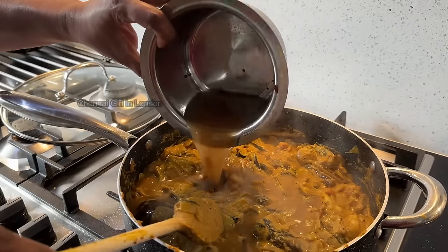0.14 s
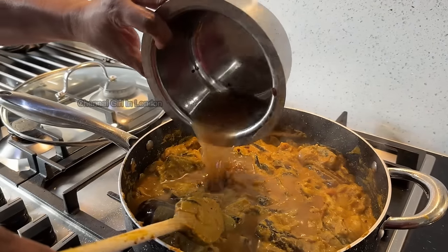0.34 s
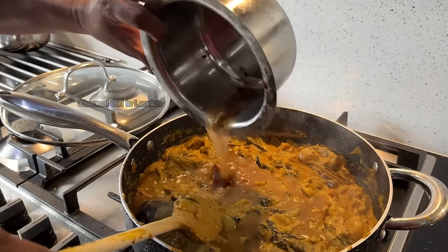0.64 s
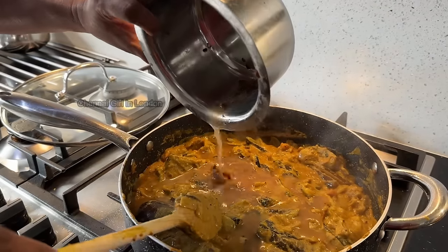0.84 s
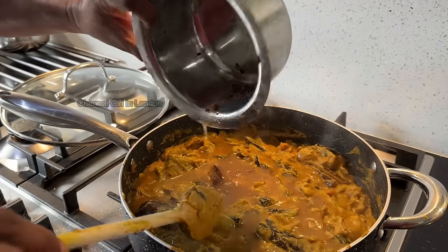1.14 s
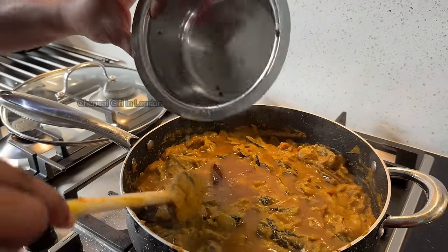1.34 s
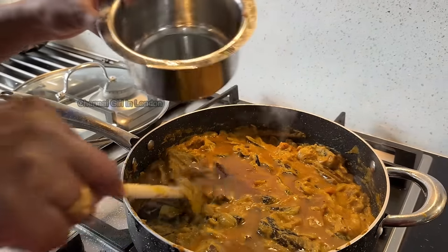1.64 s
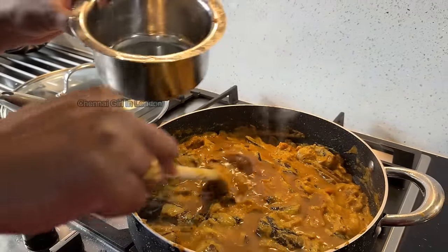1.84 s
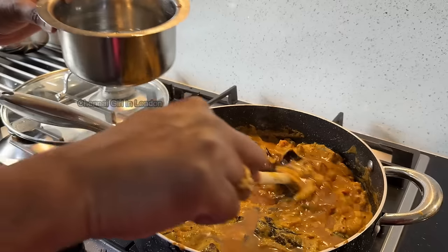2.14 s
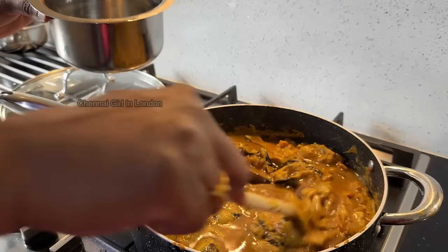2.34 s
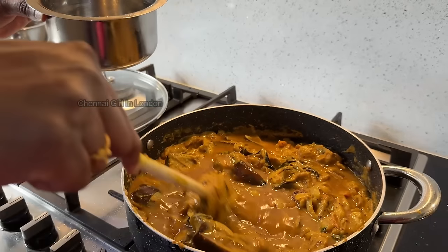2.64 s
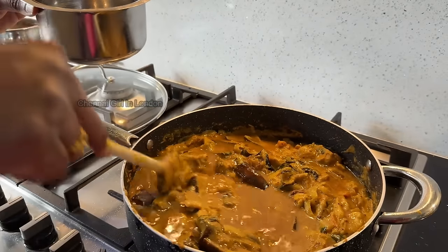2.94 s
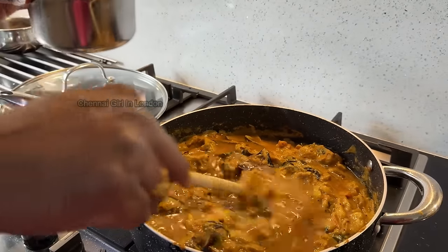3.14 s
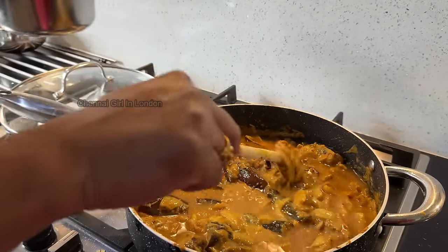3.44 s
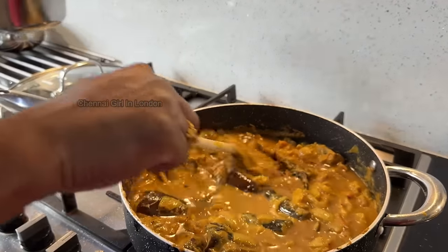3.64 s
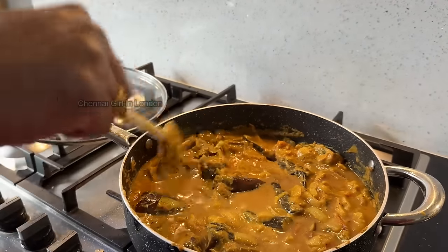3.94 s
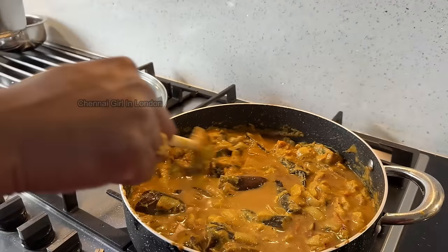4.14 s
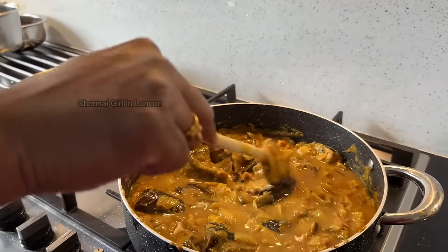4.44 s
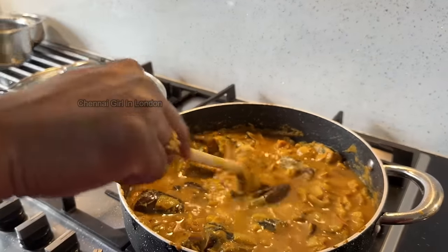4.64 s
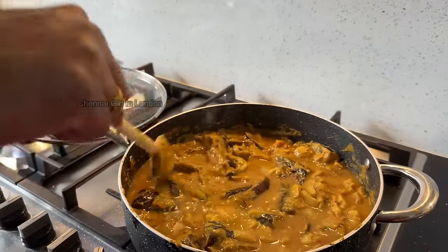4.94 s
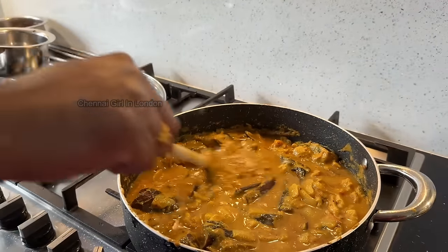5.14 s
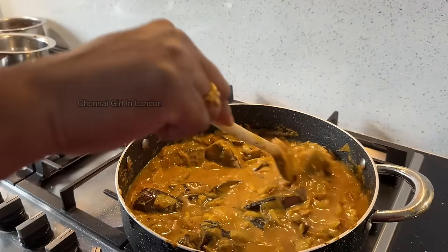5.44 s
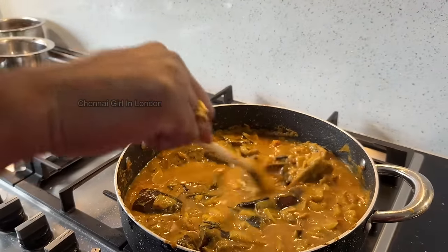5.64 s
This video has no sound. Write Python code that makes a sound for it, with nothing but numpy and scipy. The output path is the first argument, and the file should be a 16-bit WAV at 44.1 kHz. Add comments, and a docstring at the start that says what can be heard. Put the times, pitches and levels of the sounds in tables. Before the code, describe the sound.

A thin stream of liquid plinks and gurgles into a simmering pan, a spoon stirs softly, then a steel pot clangs down.

```python
"""Pouring and stirring a simmering curry

A thin stream of liquid falls from a pot into a pan of curry, then a wooden spoon stirs it.
Trapped bubbles plink as damped, rising tones; spits, steam and sauce are short bursts of filtered noise.
A gas burner hisses as shaped noise over a hum of sine lines at fixed frequencies, most wavering strongly.
Near the end the emptied steel pot is set down: its knocks excite decaying modes and a dense clang."""
import sys
import numpy as np
from scipy import signal
from scipy.fft import rfft, irfft
from scipy.io import wavfile

SR = 44100
rng = np.random.default_rng(int(sys.argv[2]) if len(sys.argv) > 2 else 0)


def wav_record(signal):
    """Record a signal, one row per channel, as 16-bit PCM in the file named by sys.argv[1]."""
    frames = np.transpose(np.atleast_2d(signal))
    bounded = np.clip(frames, -1, 1)
    # unit amplitude maps onto the largest positive 16-bit level
    quanta = np.round(bounded * 32767).astype(np.int16)
    wavfile.write(sys.argv[1], SR, quanta)


N = 255780
TIME = np.arange(N) / SR

# the falling stream, which thins, gives a last gush and dribbles out: (time [s], relative flow [dB])
POUR_FLOW = [(0, -3), (.1, -4), (.4, -2), (.5, 2), (.68, -10.5), (.8, -2.5), (1.02, -13), (1.3, -14),
             (1.5, -50)]


def gain_of(db):
    """Amplitude ratio: 20 dB for each factor of ten."""
    return 10 ** (np.asarray(db) / 20)


def evened(x):
    """Normalization to unit rms."""
    return x / np.sqrt(np.mean(x ** 2) + 1e-20)


def read(points, hz):
    """Linear interpolation of (frequency [Hz], value) on a log-frequency axis."""
    f, value = np.transpose(points)
    return np.interp(np.log(hz + 1), np.log(f + 1), value)


def level(points):
    """Envelope: (time [s], level [dB]) becomes a gain for every sample."""
    return gain_of(np.interp(TIME, *np.transpose(points)))


def add(mix, s, sound):
    """Superposition: sums a sound into the mix from time s, cut at the end."""
    part = mix[max(round(s * SR), 0):][:len(sound)]
    part += sound[:len(part)]


def hump(f, hz, width):
    """Resonance curve: gain 1 at the centre, falling with the square of the far detuning."""
    return 1 / (1 + (1.3 * (f - hz) / width) ** 2)


def colour(x, gain):
    """Linear filtering: the spectrum times a gain that is a function of frequency; rms 1."""
    f = np.fft.rfftfreq(len(x), 1 / SR)
    return evened(irfft(rfft(x) * gain(f), len(x)))


def band_noise(hz, width, size):
    """Subtractive synthesis: white noise through one resonance; rms 1."""
    return colour(rng.standard_normal(size), lambda f: hump(f, hz, width))


def drift(rate):
    """Low-passed random fluctuation without a mean; rms 1."""
    return colour(rng.standard_normal(N), lambda f: (f > 0) / (1 + (f / rate) ** 4))


def dying(x, t60s):
    """Frequency-dependent damping: each band loses 60 dB in its own t60."""
    hz, t, z = signal.stft(x, SR, nperseg=256)
    decay = gain_of(-60 * t / read(t60s, hz)[:, None])
    return signal.istft(z * decay, SR, nperseg=256)[1][:len(x)]


def plink(hz, t60, glide=.05, rise=0.00044):
    """Damped oscillator: a tone whose pitch climbs by twice the glide share over its t60."""
    t = np.arange(0, t60, 1 / SR)
    tone = np.sin(2 * np.pi * hz * t * (1 + glide * t / t60))
    return tone * gain_of(-60 * t / t60) * (1 - np.exp(-t / rise))


def burst(hz, width, t60):
    """Impulsive band noise: a crack of about a millisecond over a short exponential decay."""
    t = TIME[:4096]
    attack = 1 - np.exp(-t / .0001)
    shape = (.7 * gain_of(-60 * t / t60) + np.exp(-t / .0008)) * attack
    return evened(band_noise(hz, width, size=len(t)) * shape) * np.sqrt(np.mean(shape ** 2))


def clicks(per_s, spread_db):
    """Random impulse train: uniform times, and exponentially spread decibels that make a few large."""
    at, size = rng.random((16000, 2))[:round(per_s * N / SR)].T
    heights = gain_of(spread_db * np.minimum(-np.log(1 - size), 3))
    return np.bincount((at * N).astype(int), heights, N)


def grains(sound, per_s, spread_db):
    """Granular synthesis: one short sound repeated at random times and sizes."""
    out, train = np.zeros(N), clicks(per_s, spread_db)
    for at in np.flatnonzero(train):
        add(out, at / SR, train[at] * sound)
    return out


def hum():
    """Additive synthesis: sine lines at fixed frequencies, the 100 Hz one nearly steady, most others
    wavering strongly in amplitude and phase."""
    # mains hum and motor lines: (frequency [Hz], rms level [dB], waver [share of the level])
    lines = [(100.1, -40, 0.044), (299, -43, 0.17), (329.9, -51, 0.45), (232, -56.5, 0.68),
             (406.3, -56.5, 0.58), (761, -57, 0.85), (693, -62, 0.79), (971, -58.5, .7), (1890, -57, 0.97)]
    out = np.zeros(N)
    for hz, db, waver in lines:
        wander = 1 + waver * (drift(4.0) + 1j * drift(5.7)) / np.sqrt(2)
        line = (wander * np.exp(2j * np.pi * hz * TIME)).real
        out += gain_of(db) * np.sqrt(2 / (1 + waver ** 2)) * line
    return out


def burner(db=-40.0):
    """Turbulence noise of flame and air, with the gas jet's hiss at the resonances of its tube."""
    # steady rush of air and flame: (frequency [Hz], relative spectral level [dB per Hz])
    rush = [(25, -34), (42, -18), (68, 4), (130, 1), (200, -1), (380, -3), (530, -7.5), (1100, -5),
            (1450, -11.5), (3200, -22.5), (6000, -19.5), (10000, -28), (13000, -29.5), (15700, -26)]
    # resonances of jet and tube: (frequency [Hz], width [Hz], peak on the scale of the rush [dB])
    resonances = [(1717, 110, -4), (1848, 182, -3.5), (4580, 420, -12.5), (7234, 260, -6), (8540, 640, -13),
                  (9450, 300, -19), (10470, 140, -19), (11740, 300, -15), (12300, 700, -17)]

    def gain(f):
        power = gain_of(read(rush, f)) ** 2
        for hz, width, peak_db in resonances:
            power = power + (gain_of(peak_db) * hump(f, hz, width)) ** 2
        return np.sqrt(power)
    return gain_of(db) * colour(rng.standard_normal(N), gain)


def kitchen(x, near_db=-9, tail_db=-12):
    """Convolution reverberation: quick reflections from pan wall and tiles, then the short room tail."""
    # decay time of the room: (frequency [Hz], t60 [s])
    room_t60 = [(100, 0.43), (1000, 0.43), (5000, 0.25), (15000, 0.29)]
    t = TIME[:SR // 2]
    signs = rng.choice([-1., 1.], len(t))
    taps = signs * (rng.random(len(t)) < 2500 / SR) * (t > .001)
    near = taps * gain_of(-60 * t / 0.04)
    tail = dying(taps * (t > .008), room_t60)
    echo = gain_of(near_db) * near / np.linalg.norm(near) + gain_of(tail_db) * tail / np.linalg.norm(tail)
    return x + signal.fftconvolve(x, echo)[:N]


def seethe(db=-48, cool_db_per_s=1.5, low_hz=1500, high_hz=6200):
    """Stochastic superposition: a crowd of small wet bursts in the thinned sauce, calming as it cools."""
    pitches = np.linspace(low_hz, high_hz, num=12)
    crowd = sum(grains(burst(hz, width=970, t60=0.027), per_s=50, spread_db=3) for hz in pitches)
    return gain_of(db - cool_db_per_s * TIME) * evened(crowd)


def pushing():
    """Exponential envelopes: each push of the spoon swells to its peak and fades alike."""
    # pushes through thick sauce: (time of the hardest push [s], swell and fade time [s], level [dB])
    strokes = [(1.22, 0.055, -42), (2.03, 0.16, -40.5), (2.43, .1, -48), (2.75, .06, -45.5),
               (3.12, 0.044, -37.5), (3.88, 0.11, -49), (5.189, .034, -34.5)]
    return sum(gain_of(db) * np.exp(-abs(TIME - s) / fade) for s, fade, db in strokes)


def simmer(db=-48.5, cool_db_per_s=1.7, pour_flare_db=4, stir_flare_db=36):
    """Boiling noise: tiny steam blisters tick, many very high; new liquid cools, pour and spoon stir."""
    pitches = np.concatenate([np.linspace(11600, 14800, num=16), np.linspace(3000, 11000, num=9)])
    ticks = sum(grains(burst(hz, width=2200, t60=0.019), per_s=7, spread_db=5.0) for hz in pitches)
    pour_flare = gain_of(pour_flare_db) * level(POUR_FLOW)
    stir_flare = gain_of(stir_flare_db) * pushing()
    heat = gain_of(-cool_db_per_s * TIME) * np.sqrt(1 + pour_flare ** 2 + stir_flare ** 2)
    return gain_of(db) * heat * evened(ticks)


def sputter(first=3.7163, db=-32, body_db=-6, attack_s=.065, release_s=.08):
    """Relaxation oscillation: a steam vent puffs fifty times a second in a train that swells and fades."""
    out, ages = np.zeros(N), np.arange(1, 16) / 50
    for age in ages:
        opening = min(age / attack_s, 1, (ages[-1] - age) / release_s)
        hiss = burst(rng.normal(12800, 300), width=1900, t60=0.0092)
        body = gain_of(body_db) * burst(6300, width=2400, t60=0.009)
        add(out, first + age - ages[0], gain_of(db) * opening ** 2 * (hiss + body))
    return out


def pops(bubbles_db=3, spits_db=3, snap_db=-7):
    """Bubble resonance and bursting: single plinks, each with a small wet snap, and single spits."""
    # largest trapped air bubbles, the last row instead the narrow ping that rings with the spoon's tick at 3.6
    # s: (time [s], level before bubbles_db [dB], pitch [Hz])
    bubbles = [(0.0774, -22, 5100), (.1106, -30, 4750), (.1201, -25.5, 3160), (0.2202, -31, 4900),
               (0.2575, -28, 1760), (.2825, -28.5, 11600), (.298, -28, 3340), (0.3274, -18, 4430),
               (.3671, -29, 3470), (0.4076, -29, 9100), (0.432, -23, 2150), (.4612, -24.5, 2680),
               (.4855, -28, 5200), (.7565, -25, 2030), (.7903, -21, 4770), (0.8173, -26, 2590),
               (.8765, -27, 4100), (1.1912, -36, 5040), (1.4645, -31, 4500), (3.289, -31, 1210),
               (3.4183, -29, 4850), (3.446, -33, 6380), (3.6035, -26, 3760)]
    # loudest spits of drops and bursting blisters: (time [s], level before spits_db [dB], centre [Hz])
    spits = [(.1223, -39, 12500), (.161, -30.5, 1000), (.162, -33, 12700), (.3385, -33, 12000),
             (.369, -34, 4900), (.3993, -31, 5600), (.498, -32, 3600), (.508, -37, 11000),
             (.572, -29, 14000), (.573, -31, 3800), (.746, -32, 12400), (.757, -27.5, 6550),
             (.776, -33, 7650), (.778, -25, 14500), (0.836, -25, 11400), (.8401, -29, 1920),
             (1.548, -33, 12600), (2.245, -41, 12500), (2.488, -39, 13000), (4.87, -41, 13000),
             (5.2496, -39, 13200)]
    mid_hz = 3000  # pitch at which the times and the width below hold
    bubble_t60_s, bubble_damping = 0.018, 0.19  # ring time shortens with this power of the pitch
    spit_width_hz, spit_widening = 2500, .3  # band width grows with this power of the pitch
    spit_t60_s, spit_damping = .036, 0.53  # smaller, higher spits die sooner
    out = np.zeros(N)
    for s, db, hz in bubbles:
        snap = gain_of(snap_db) * burst(hz, width=1.0 * hz, t60=0.0063)
        ring = plink(hz, bubble_t60_s * (mid_hz / hz) ** bubble_damping, glide=0.033, rise=0.00053)
        add(out, s, gain_of(db + bubbles_db) * ring)
        add(out, s, gain_of(db) * snap)
    for s, db, hz in spits:
        width = spit_width_hz * (hz / mid_hz) ** spit_widening
        t60 = spit_t60_s * (mid_hz / hz) ** spit_damping
        add(out, s, gain_of(db + spits_db) * burst(hz, width, t60))
    return out


def rocking(count=4, start_s=5.653, gap_s=0.035, force_db=-19, loss_db=2.5, hz=203):
    """Impact energy loss: the pot rocks to rest in evenly spaced, ever weaker thuds, as rows of blows."""
    return [(start_s + k * gap_s, force_db - k * loss_db, hz) for k in range(count)]


def clatter(clang_db=-15.5, modes_db=-3.5, spot_db=-6, ring=0.99):
    """Modal synthesis: each knock sets off a dense clang and feeds energy into the pot's modes."""
    # the pot's base knocking down: (time [s], force [dB], pitch of the struck spot [Hz])
    blows = [(5.535, -7, 1308), (5.5385, -2, 2290), (5.5424, 0.5, 2258), (5.5557, -3.5, 2330),
             (5.5626, -6.5, 2260), (5.572, -11, 7780), (5.594, -8.5, 3355), (5.609, -11.5, 2250)]
    # strong modes of the steel pot: (frequency [Hz], level before modes_db [dB], t60 before ring [s])
    modes = [(302, -30, .3), (391, -22.5, .35), (480, -32, .8), (685, -30, .7), (735, -27, .6),
             (762, -20, .4), (813, -26, .3), (925, -28, .35), (957, -25, .4), (1058, -27, .35),
             (1445, -30, .45), (1600, -28, .3), (1780, -28, .4), (2160, -27, .55), (2268, -20, .4),
             (2319, -21, .36), (2562, -30, .25), (2895, -20, .33), (2965, -30, .35), (3361, -21, .38),
             (3550, -29, .3), (4716, -32, .43), (5055, -33, .5), (5271, -32, .42), (5353, -29, .35),
             (5548, -30, .25), (6535, -28, .45), (7719, -27, .22), (8440, -32, .28), (9938, -32, .22)]
    # crowd of weaker modes, blurred by the room: (frequency [Hz], relative level [dB per Hz], t60 [s])
    clang = np.array([(50, -26, 0.46), (130, -5, 0.46), (320, -5, .55), (750, 0, 0.59), (1300, 0, 0.43),
                      (2020, -1.5, 0.56), (2940, 3.5, 0.36), (3900, -4, 0.55), (5400, -3, 0.48),
                      (8350, -3.5, 0.33), (9200, -9, 0.34), (12200, -4.5, 0.27), (15700, -1.5, 0.16)])
    # spectral tilt of a knock at 0 dB force [dB per octave], and its change per dB of force
    bright_db_per_octave, bright_per_force_db = 1.86, 0.63
    out, feed = np.zeros(N), np.zeros(N)
    knots = np.arange(0, SR / 2, 55)
    # the weak modes differ in strength, alike for every knock
    uneven_db = 3 * rng.standard_normal(len(knots)) * np.minimum(knots / 4000, 1)
    for s, force_db, hz in list(blows) + rocking():
        # hard knocks are brighter
        bright_db = bright_db_per_octave + bright_per_force_db * force_db

        def spectrum(f):
            tilt_db = bright_db * np.log2(1 + f / 500)
            return gain_of(read(clang[:, :2], f) + np.interp(f, knots, uneven_db) + tilt_db)
        crash = colour(rng.standard_normal(SR // 2), spectrum)
        add(out, s, gain_of(clang_db + force_db) * dying(crash, clang[:, ::2]))
        add(out, s, gain_of(spot_db + force_db) * plink(hz, t60=0.048, glide=0, rise=0.002))
        add(feed, s, [gain_of(force_db) ** 2])
    for hz, db, t60 in modes:
        # energies of successive knocks add up while they decay
        kept = gain_of(-60 / (ring * t60 * SR)) ** 2
        energy = signal.lfilter([1], [1, -kept], feed)
        tone = np.sin(2 * np.pi * (hz * TIME + rng.random()))
        out += gain_of(db + modes_db) * np.sqrt(energy) * tone
    return out


def bumps(width_share=.55, t60_s=0.19):
    """Damped impact: dull knocks of the spoon nudging the pan, cushioned by the sauce."""
    # nudges: (time [s], level [dB], centre [Hz])
    nudges = [(1.966, -33.5, 230), (2.01, -30, 232), (2.375, -34.5, 200), (3.09, -38, 200),
              (5.175, -27.5, 620)]
    out, t = np.zeros(N), TIME[:SR // 4]
    shape = gain_of(-60 * t / t60_s) * (1 - np.exp(-t / 0.0045))
    for s, db, hz in nudges:
        knock = evened(band_noise(hz, width_share * hz, size=len(t)) * shape)
        add(out, s, gain_of(db) * knock * np.sqrt(np.mean(shape ** 2)))
    return out


def spoon_ticks(ticks_db=3):
    """Contact impact: wood meets the pan with a bright crack over a short, dry body."""
    # (time [s], body level before ticks_db [dB], body centre [Hz], crack level before ticks_db [dB])
    ticks = [(2.857, -34, 2900, -32.5), (3.4185, -39, 5500, -44), (3.603, -32, 3800, -50),
             (3.997, -35.5, 3900, -47), (4.17, -30.5, 2700, -34), (4.226, -32.5, 2900, -50),
             (4.5453, -37, 3000, -52), (4.6725, -40, 4200, -48), (5.1278, -30, 1800, -31.5)]
    out = np.zeros(N)
    for s, body_db, hz, edge_db in ticks:
        body = gain_of(body_db) * burst(hz, width=2360, t60=.035)
        crack = gain_of(edge_db) * burst(10000, width=22000, t60=0.028)
        add(out, s, body + crack)
    return gain_of(ticks_db) * out


def spoon(sizzle_db=1, churn_db=-55.5, churn_pour_db=-46):
    """Filtered impulse noise: soft squelches of thick sauce, and sizzles where it meets hot metal."""
    # colour of the squelches: (frequency [Hz], relative spectral level [dB per Hz])
    slosh = [(60, -28), (150, -7), (240, -1), (650, -1), (1000, -4), (1500, -10), (3000, -18), (8000, -35)]
    # sauce sizzling where the spoon bares hot metal:
    # (time [s], length [s], level before sizzle_db [dB], centre [Hz], width [Hz])
    sizzles = [(1.49, .42, -57, 13400, 2400), (2.41, 0.18, -43.5, 3600, 2600),
               (2.549, 0.23, -52, 2390, 1300), (2.899, 0.31, -44, 9300, 4000),
               (3.131, 0.12, -44, 9600, 750), (3.589, .14, -46.5, 3800, 1900)]
    # the sauce also heaves between pushes, and under the stream
    pour_churn = gain_of(churn_pour_db) * level(POUR_FLOW)
    churn = np.sqrt(pushing() ** 2 + gain_of(churn_db) ** 2 + pour_churn ** 2)
    out = churn * colour(clicks(per_s=900, spread_db=5), lambda f: gain_of(read(slosh, f)))
    for s, length, db, hz, width in sizzles:
        train = clicks(per_s=1500, spread_db=5.0)[:round(length * SR)]
        fizz = colour(train, lambda f: hump(f, hz, width))
        add(out, s, gain_of(db + sizzle_db) * fizz * signal.windows.tukey(len(fizz), .7))
    return out


def stream(bubbles_db=-41.5, splash_db=-45, cycles=26):
    """Air entrainment: the stream drags in many small, quickly damped bubbles and patters on the sauce."""
    pitches = np.geomspace(1400, 5500, num=30) * rng.uniform(1.0, 1.03, size=30)
    swarm, slaps = np.zeros(N), np.zeros(N)
    for hz in pitches:
        bubble = plink(hz, t60=cycles / hz, glide=0.046, rise=0.00045)
        swarm += np.sqrt(hz) * grains(bubble, per_s=7, spread_db=3.5)
    for hz in np.geomspace(1100, 7500, num=16):
        slaps += grains(burst(hz, width=.8 * hz, t60=0.0068), per_s=28, spread_db=2.0)
    return level(POUR_FLOW) * (gain_of(bubbles_db) * evened(swarm) + gain_of(splash_db) * evened(slaps))


def scene():
    """Superposition: the pan with its reflections, the pot, the burner and the hum."""
    pan = seethe() + simmer() + sputter() + pops() + bumps() + spoon_ticks() + spoon() + stream()
    return (hum() + burner() + clatter() + kitchen(pan))[None]


def record(dry, edge_hz=15780):
    """Band limiting: the microphone's bass roll-off, then a steep low-pass at edge_hz."""
    roll_off = signal.butter(2, 40, "highpass", fs=SR, output="sos")
    thin = signal.sosfilt(roll_off, dry)
    low_pass = signal.firwin(511, edge_hz, window=("kaiser", 9), fs=SR)
    return signal.oaconvolve(thin, low_pass[None], "same")


dry = scene()
out = record(dry)
wav_record(out)
```